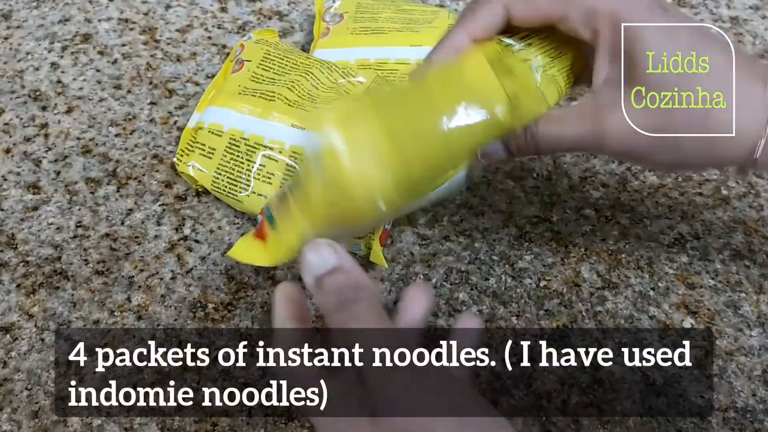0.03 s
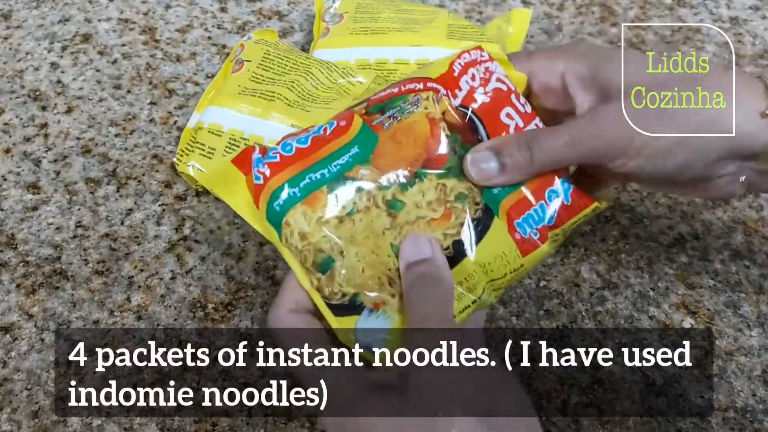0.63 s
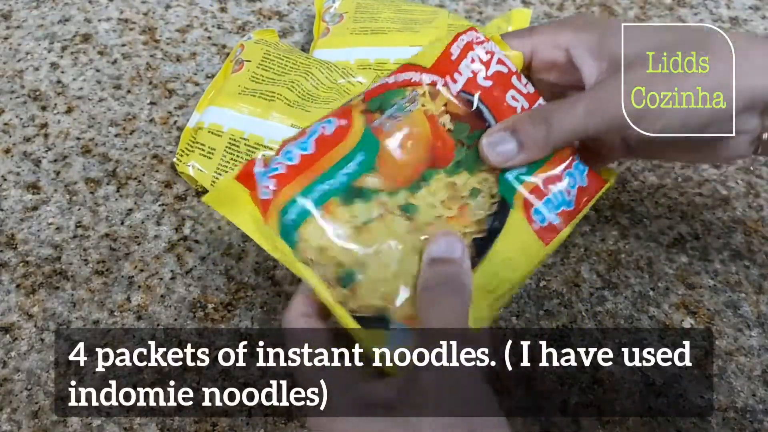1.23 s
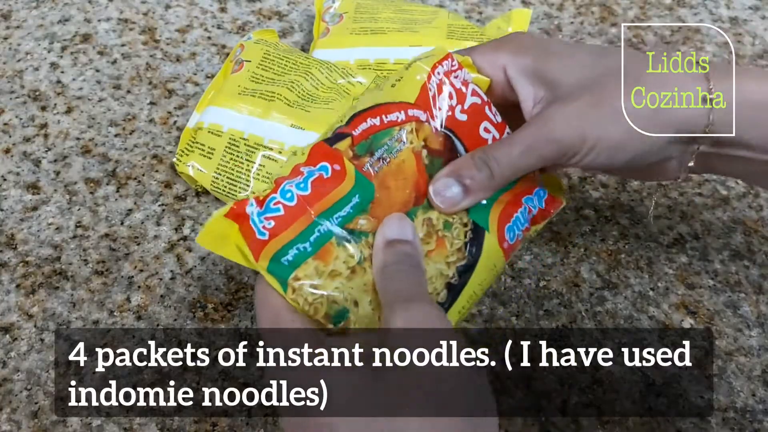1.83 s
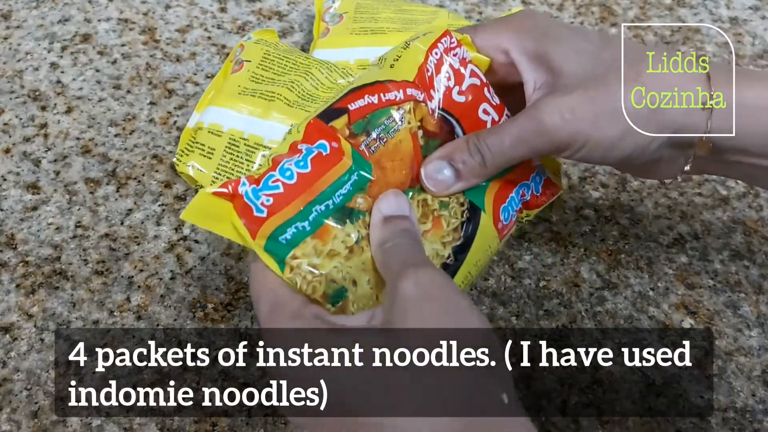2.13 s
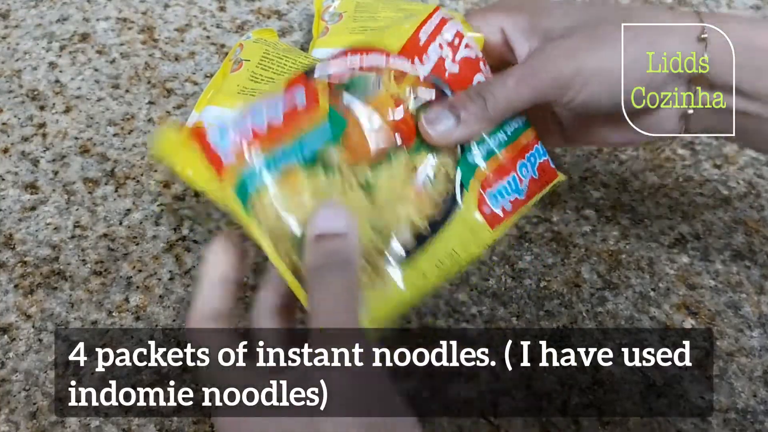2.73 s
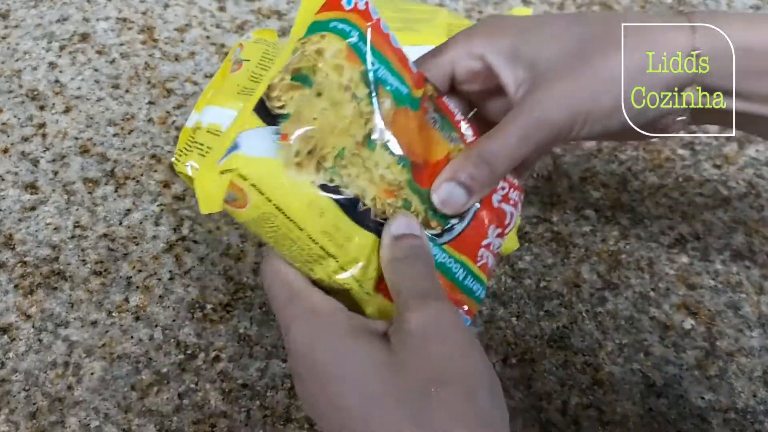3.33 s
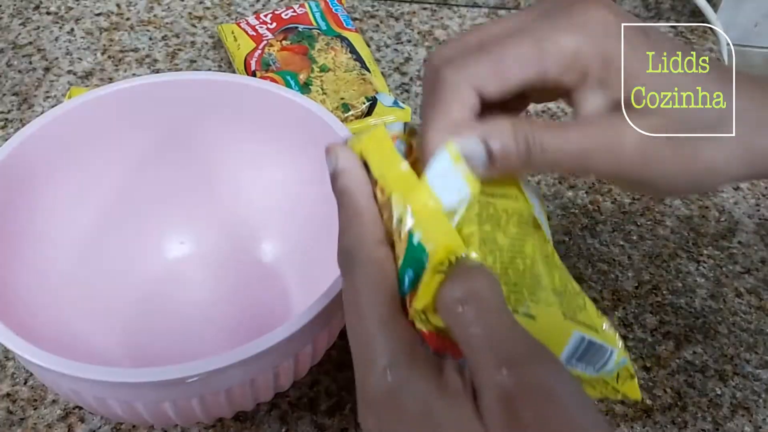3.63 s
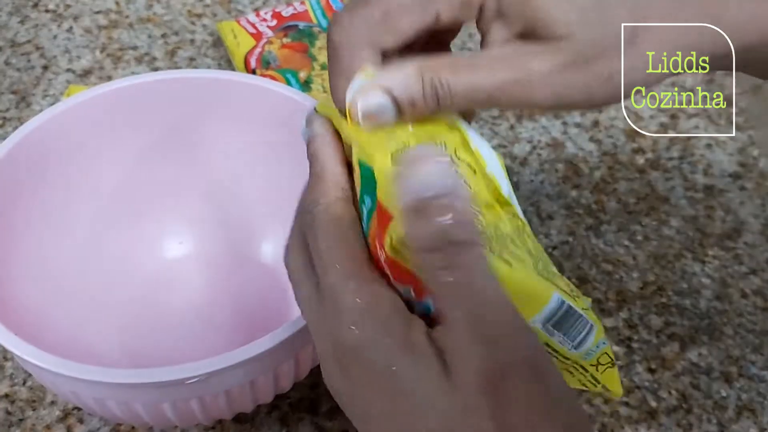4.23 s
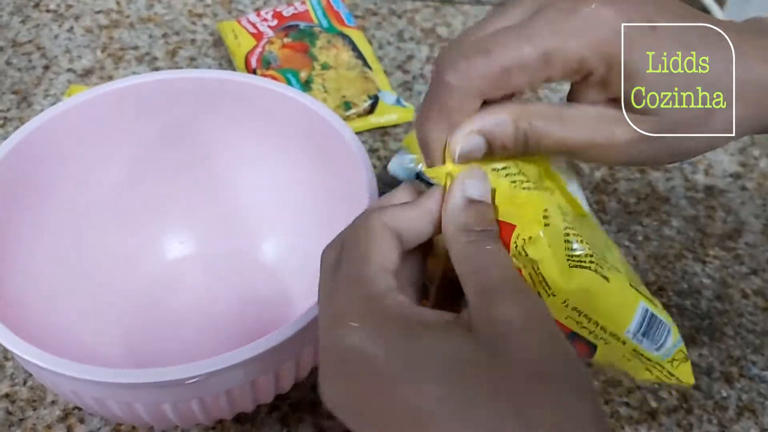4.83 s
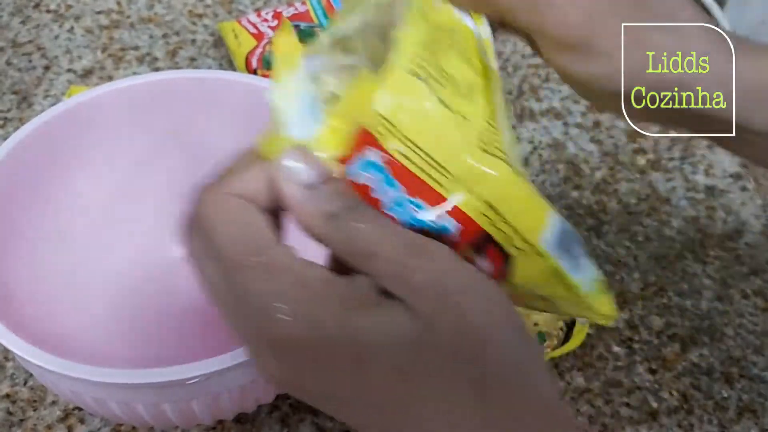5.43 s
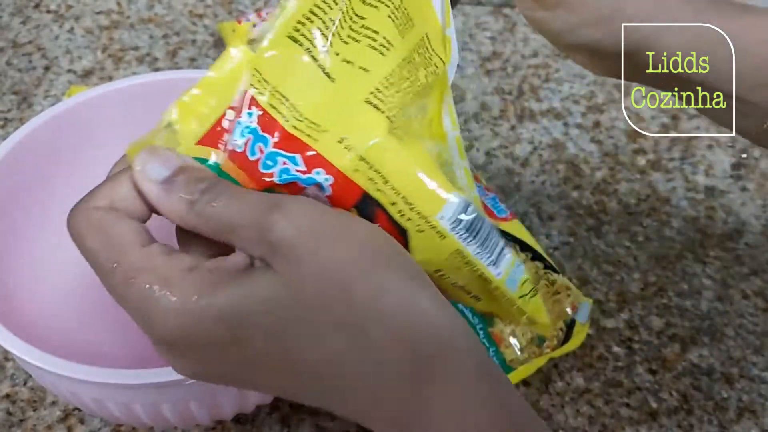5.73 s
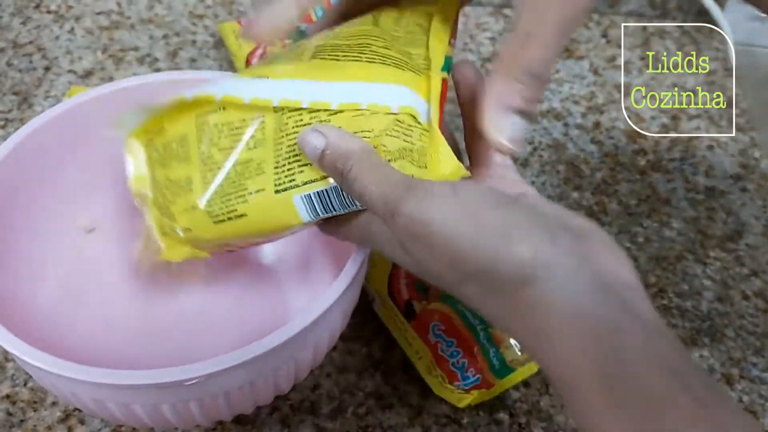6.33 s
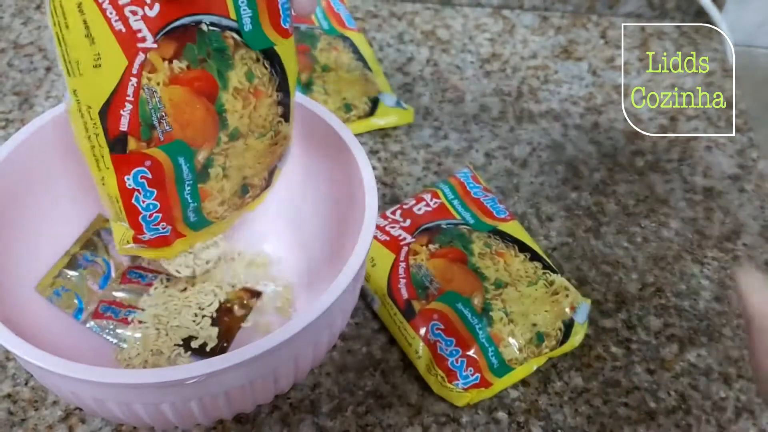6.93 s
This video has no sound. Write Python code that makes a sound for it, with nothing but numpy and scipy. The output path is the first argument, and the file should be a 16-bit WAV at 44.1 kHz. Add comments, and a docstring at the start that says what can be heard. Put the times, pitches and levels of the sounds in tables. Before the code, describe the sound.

From the start, hands squeeze a thin plastic noodle packet close by, making irregular sharp snaps and small pops over a fine crinkle. The strongest snaps come around 0.7 and 2.3 seconds, and the handling grows softer towards 3 seconds. At about 3.5 seconds the sound cuts out for an instant and returns brighter and closer, with a faint motor hum and room air slightly louder. The packet keeps crackling as fingers pull at it, with dull bumps from about 4.4 seconds. Near 5.2 seconds the seam opens in one short rip with a rough, falling note, followed by more rustling. From about 6.2 seconds dry noodles, crumbs and sachets slide into a plastic bowl, rattling most strongly around 6.5 seconds with short hollow knocks. A few lighter ticks and low thuds follow until about 6.9 seconds. The small, hard kitchen adds a brief ring.

```python
"""Noodle packet into a bowl.

Hands squeeze a plastic noodle packet over a stone counter, tear it open and tip it into a plastic bowl.
The film buckles in loud single snaps over a swarm of tiny creases; the dry noodles rattle into the bowl.
A small hard kitchen rings; dull bumps and a faint hum lie underneath. Midway the sound cuts out briefly.
"""
import sys
import numpy as np
from scipy import signal
from scipy.io import wavfile
from scipy.ndimage import uniform_filter1d

SR = 44100
rng = np.random.default_rng(int(sys.argv[2]) if len(sys.argv) > 2 else 0)


def transcribe(u):
    """Save the signal u as a 16-bit wav file named by the first command-line argument.

    u: samples, shape (n,) or (channels, n), limited to [-1, 1]; the rate is SR.
    q: integer samples, one column per channel.
    """
    v = np.clip(np.atleast_2d(u).T, -1, 1)
    q = np.round(v * 32767).astype(np.int16)
    wavfile.write(sys.argv[1], SR, q)


N = 307377
TIME_S = np.arange(N) / SR
FILTER_TAPS = 2048
DROPOUT_START_S, DROPOUT_END_S = 3.475, 3.507


def gain(db):
    """Decibels to amplitude."""
    return 10 ** (np.asarray(db) / 20)


def unit_rms(x):
    """Scales to rms 1."""
    return x / np.sqrt(np.mean(x ** 2) + 1e-20)


def unit_click(pair, window_s=0.002):
    """Scales a stereo click to the energy of rms 1 over the window."""
    return pair / np.sqrt(np.sum(pair ** 2) / 2 / (window_s * SR))


def at_hz(table, hz):
    """Interpolates a table on a log-frequency axis."""
    table_hz, values = np.transpose(table)
    return np.interp(np.log(hz + 1), np.log(table_hz + 1), values)


def curves(table):
    """The columns of a time table at every sample."""
    times_s, *columns = np.transpose(table)
    return [np.interp(TIME_S, times_s, column) for column in columns]


def strokes(rows, attack_s, release_s, rise_share=0):
    """One envelope per (start, length, level) row: linear rise, hold, exponential release."""
    envelopes = []
    for start_s, length_s, db, *_ in rows:
        rise = np.clip((TIME_S - start_s) / (attack_s + rise_share * length_s), 0, 1)
        release = np.exp(-np.maximum(TIME_S - start_s - length_s, 0) / release_s)
        envelopes.append(gain(db) * rise * release)
    return np.array(envelopes)


def add(mix, start_s, sound):
    """Mixes a sound in at start_s."""
    part = mix[:, max(round(start_s * SR), 0):][:, :sound.shape[1]]
    part += sound[:, :part.shape[1]]


def butter(order, hz, kind):
    """Butterworth filter sections."""
    return signal.butter(order, hz, kind, fs=SR, output="sos")


def coloured(x, spectrum):
    """Minimum-phase filter of unit energy; clicks keep their sharp front."""
    log_gain = np.log(gain(at_hz(spectrum, abs(np.fft.fftfreq(FILTER_TAPS, 1 / SR)))))
    pulse = np.fft.ifft(np.exp(np.conj(signal.hilbert(log_gain)))).real
    return signal.oaconvolve(x, pulse[None] / np.linalg.norm(pulse), axes=1)[:, :x.shape[1]]


def resonate(x, hz, width_hz):
    """Unity-gain resonance, steady or gliding."""
    carrier = np.exp(2j * np.pi * np.cumsum(hz * np.ones(x.shape[1])) / SR)
    pole = np.exp(-np.pi * width_hz / SR)
    return 2 * (carrier * signal.lfilter([1 - pole], [1, -pole], x / carrier + 1e-18)).real


def ringing(x, modes):
    """Adds a body's modes at constant power."""
    ring = sum(gain(db) * resonate(x, hz, width_hz) for hz, width_hz, db in modes)
    return unit_rms(x + ring) * x.std()


def tinted(x, body_db, sizzle_db, body_hz=900, sizzle_hz=4000):
    """Shifts power between low, middle and high bands."""
    low = signal.sosfiltfilt(butter(2, body_hz, "low"), x)
    high = signal.sosfiltfilt(butter(3, sizzle_hz, "high"), x)
    bands, gains = [low, x - low - high, high], [gain(body_db), 1, gain(sizzle_db)]
    power = sum(g ** 2 * b.var() for g, b in zip(gains, bands)) / sum(b.var() for b in bands)
    return sum(g * b for g, b in zip(gains, bands)) / np.sqrt(power)


def buckle(decay_s, ring_hz, ring_db, flutter_db=-20, flutter_s=0.14, samples=512):
    """A facet flips, rings and shivers; on the right it is late and has its own treble."""
    t = np.arange(samples) / SR
    flip = (t / decay_s) ** 2 * np.exp(2 - 2 * t / decay_s)
    flutter = gain(flutter_db) * np.exp(-t / flutter_s)
    burst = rng.standard_normal((2, samples)) * (flip + flutter)
    left, other = burst + gain(ring_db) * resonate(burst, ring_hz, 0.44 * ring_hz)
    crossover = butter(1, hz=1900, kind="low")
    right = signal.sosfilt(crossover, left) + other - signal.sosfilt(crossover, other)
    pair = np.array([left, np.pad(right, (4, 0))[:samples]])
    return pair / np.sqrt(np.sum(pair ** 2) / 2)


def swarm(rate_per_s, spread_db, decay_s, levelling_s, ring_db, facets=40):
    """Random tiny fractures of unequal size; larger facets are slower and lower."""
    sizes = gain(spread_db * np.minimum(rng.exponential(1, N), 3.5))
    sizes *= rng.random(N) < rate_per_s / SR
    local_power = uniform_filter1d(sizes ** 2, int(levelling_s * SR))
    sizes /= np.sqrt(abs(local_power) + 1e-4)
    facet, out = rng.integers(0, facets, N), np.zeros((2, N))
    for k, scale in enumerate(np.geomspace(1 / 3, 3, facets)):
        grain = buckle(decay_s * np.sqrt(scale), 2600 / scale, ring_db)
        out += signal.oaconvolve((sizes * (facet == k))[None], grain, axes=1)[:, :N]
    return out


# room air: (frequency [Hz], relative density [dB])
AIR_SPECTRUM = [(20, -11), (60, 0.5), (110, -22), (200, -1), (500, -13.5), (2000, -11.5), (8000, -26),
                (16000, -29)]
# motor hum: (frequency [Hz], level before dropout [dB], level after [dB])
HUM_PARTIALS = [(101, -66, -58.5), (126.6, -70.5, -54.5)]


def room_tone(air_before_db=-60, air_after_db=-53):
    """Room air and a humming motor, both louder after the dropout."""
    late = TIME_S > DROPOUT_END_S
    noise = rng.standard_normal((2, N))
    air = unit_rms(coloured(noise + 0.22 * noise[::-1], AIR_SPECTRUM))
    out = air * gain(np.where(late, air_after_db, air_before_db))
    for hz, before_db, after_db in HUM_PARTIALS:
        hum = unit_rms(resonate(noise[:1], hz, width_hz=12))
        out += hum * gain(np.where(late, after_db, before_db))
    return out


# kitchen reverberation: (frequency [Hz], T60 [s])
KITCHEN_DECAY = [(150, 0.76), (500, 1), (1500, 0.64), (4000, 0.57), (8000, 0.52), (16000, 0.62)]


def kitchen(x, tail_db=-5.5, early_db=-9, mono_below_hz=500, taps_per_s=5000, echoes=8):
    """Echoes off counter and hands, then a diffuse tail with bass alike on both sides."""
    t = np.arange(SR * 3 // 4) / SR
    taps = rng.choice([-1., 1.], (2, len(t))) * (rng.random((2, len(t))) < taps_per_s / SR)
    onset = np.clip((t - 0.003) / 0.00045, 0, 1)
    hz, frame_s, spectra = signal.stft(taps * onset, SR, nperseg=256)
    coherence = np.exp(-(hz / mono_below_hz) ** 2 / 2)[:, None]
    spectra[1] = coherence * spectra[0] + np.sqrt(1 - coherence ** 2) * spectra[1]
    decay = gain(-60 * frame_s / at_hz(KITCHEN_DECAY, hz)[:, None])
    response = signal.istft(spectra * decay, SR, nperseg=256)[1]
    response *= gain(tail_db) / np.linalg.norm(response[0])
    for side in response:
        echo_s = rng.uniform(0.001, 0.017, echoes)
        side[(echo_s * SR).astype(int)] += gain(early_db) * rng.choice([-1, 1], echoes) / np.sqrt(echoes)
    return signal.fftconvolve(x, response, axes=1)[:, :N]


# bumps of hands and packet: (time [s], level [dB], pitch [Hz])
HAND_BUMPS = [(4.426, -30, 95.5), (4.711, -30.5, 97), (4.776, -29.5, 97), (5.087, -32.5, 83.5),
              (5.144, -37, 101), (6.173, -38.5, 94), (6.548, -32.5, 121), (6.645, -31.5, 128),
              (6.668, -29, 89), (6.768, -33.5, 108), (6.827, -28.5, 176), (6.875, -24, 101)]


def bumps(rise_s=0.0097, left_vs_right_db=-27):
    """Low, quickly damped thuds, mostly on the right."""
    out, t = np.zeros((2, N)), np.arange(SR // 5) / SR
    envelope = t / rise_s * np.exp(1 - t / rise_s)
    pan = gain([[left_vs_right_db], [0]])
    for start_s, db, hz in HAND_BUMPS:
        grit = signal.sosfilt(butter(2, [0.18 * hz, 1.74 * hz], "band"), rng.standard_normal(len(t)))
        thud = np.sin(2 * np.pi * hz * t) + 0.5 * unit_rms(grit)
        add(out, start_s, gain(db) * pan / pan.mean() * envelope * thud)
    return out


def rumble(band_hz=(50, 130), left_db=-17, offset_db=-8, length_s=0.018):
    """Each bump leaves a loose low flutter."""
    rows = [(start_s, length_s, db + offset_db) for start_s, db, _ in HAND_BUMPS]
    level = np.linalg.norm(strokes(rows, attack_s=0.06, release_s=0.17), axis=0)
    flutter = signal.sosfilt(butter(2, band_hz, "band"), rng.standard_normal((2, N)))
    return unit_rms(flutter) * gain([[left_db], [0]]) * level


# air pocket in the bag: (time [s], level [dB], resonance [Hz])
AIR_POCKET = [(5.14, -40, 520), (5.2, -30, 446.6), (5.235, -24.5, 329), (5.255, -43, 330),
              (5.305, -35.5, 310), (5.33, -63, 320)]


def air_pocket(roughness=0.85):
    """Tearing drives the air in the bag; its rough note sinks as the bag opens."""
    level_db, hz = curves(AIR_POCKET)
    flapping = resonate(rng.standard_normal((1, N)), hz, width_hz=90)
    flapping = unit_rms(resonate(flapping, hz, width_hz=200))
    tone = np.sin(2 * np.pi * np.cumsum(hz) / SR)
    gate = (TIME_S >= AIR_POCKET[0][0]) & (TIME_S <= AIR_POCKET[-1][0])
    return unit_rms(tone + roughness * flapping) * gain(level_db) * gate


# bag pops and one handling thump: (time [s], peak [dB], pitch [Hz], T60 [s])
PITCHED_POPS = [(0.687, -21, 954, 0.13), (.757, -26, 1010, 0.053), (2.268, -25, 678, 0.25),
                (2.288, -26.5, 532, 0.16), (3.671, -15.5, 564, 0.027), (3.994, -25.5, 353, 0.057),
                (4.071, -22, 457, 0.043), (4.4914, -29.5, 126, 0.12), (4.489, -12.5, 420, 0.012),
                (5.223, -20, 1043, 0.09), (5.872, -19, 327, 0.032)]


def pops():
    """Short pitched pops of the air in the bag, and one low handling thump."""
    out, t = np.zeros((2, N)), np.arange(SR // 4) / SR
    for start_s, db, hz, t60_s in PITCHED_POPS:
        note = gain(db - 60 * t / t60_s) * np.sin(2 * np.pi * hz * t)
        add(out, start_s, note[None])
    return out


# pull on the seam: (start [s], length [s], level [dB])
SEAM_PULLS = [(5.16, 0.066, -17.5)]
# tearing seam: (frequency [Hz], relative density [dB])
SEAM_SPECTRUM = [(150, -14), (400, 0), (1200, -1.5), (2400, 0.5), (3700, -3), (5800, -1.5), (8000, -4),
                 (9700, -12.5), (16000, -10)]


def seam_tear():
    """The seam parts in a dense run of fractures."""
    fractures = swarm(rate_per_s=2200, spread_db=3.5, decay_s=0.00028, levelling_s=0.018, ring_db=5.5)
    level = strokes(SEAM_PULLS, attack_s=0.0096, release_s=0.026).sum(0)
    return unit_rms(coloured(fractures, SEAM_SPECTRUM)) * level


# block, sachets and crumbs sliding out: (start [s], length [s], level [dB])
NOODLE_SPILLS = [(6.2, 0.27, -33.5), (6.405, 0.086, -18), (6.475, 0.023, -23), (6.53, 0.081, -28),
                 (6.635, 0.047, -28.5), (6.745, 0.024, -29.5), (6.83, 0.069, -33.5)]
# dry noodles: (frequency [Hz], relative density [dB])
NOODLE_SPECTRUM = [(150, -38), (400, -11.5), (640, -11), (900, -8), (1500, -12), (2200, -10), (2950, -2),
                   (3900, -5), (5400, -3), (7800, -5.5), (9800, -14.5), (13000, -12), (16000, -13)]
# plastic bowl: (frequency [Hz], width [Hz], gain [dB])
BOWL_MODES = [(685, 110, 0.5), (1370, 75, 5), (1690, 46, 4), (2100, 110, 0), (3200, 50, -1)]
# hollow note, sinking as the noodles settle: (time [s], frequency [Hz])
HOLLOW_GLIDE = [(6.44, 2690), (6.6, 2260)]


def pour(hollow_width_hz=380, hollow_db=1, right_lag_samples=7):
    """Dry crumbs strike the bowl on the left, thickest as the block drops out."""
    level = np.linalg.norm(strokes(NOODLE_SPILLS, attack_s=0.0075, release_s=0.062), axis=0)
    rate_per_s = 220 + 1400 * level / gain(-17)
    crumbs = swarm(rate_per_s, spread_db=3, decay_s=0.0012, levelling_s=0.04, ring_db=7)
    hollow_mode = (curves(HOLLOW_GLIDE)[0], hollow_width_hz, hollow_db)
    rattle = ringing(coloured(crumbs, NOODLE_SPECTRUM), BOWL_MODES + [hollow_mode])
    left, right = unit_rms(rattle) * level
    return np.array([left, np.roll(right, right_lag_samples)])


# lumps and sachets landing: (time [s], level over 2 ms [dB], pitch [Hz])
BOWL_KNOCKS = [(6.4352, -15.5, 670), (6.4474, -15, 2500), (6.4527, -30, 3200), (6.4805, -9, 2870),
               (6.4932, -18, 2950), (6.4972, -16, 2800), (6.5135, -21, 3100), (6.5235, -16, 3060),
               (6.5861, -18.5, 1380), (6.68, -21.5, 2320), (6.757, -26, 3460), (6.783, -27, 5000)]


def knocks():
    """A hard lump lands; the thin plastic wall answers with a short hollow note."""
    out = np.zeros((2, N))
    for start_s, db, hz in BOWL_KNOCKS:
        blow = buckle(decay_s=0.00089, ring_hz=hz, ring_db=10, samples=1024)
        knock = ringing(coloured(blow, FILM_SPECTRUM), BOWL_MODES)
        add(out, start_s, gain(db) * unit_click(knock))
    return out


# thin plastic: (frequency [Hz], relative density [dB])
FILM_SPECTRUM = [(40, -52), (100, -10.5), (220, -12), (320, -3.5), (420, -4), (570, -3), (800, -8),
                 (1400, -4), (2300, -0.5), (3000, -2.5), (3800, -5), (6200, -6), (8000, -10.5),
                 (9500, -17.5), (16000, -19)]
# squeezes and pulls: (start [s], length [s], level [dB], body [dB], sizzle [dB])
FINGER_GRIPS = [(-0.02, 0.36, -32.5, -2, -0.5), (0.356, 0.14, -44, -0.5, -8), (0.552, 0.11, -29.5, 1, -2.5),
                (0.742, 0.24, -44.5, 6.5, 26), (0.939, 0.068, -29.5, -13, 2.5),
                (1.131, 0.18, -35.5, 2, -1.5), (1.376, 0.087, -36.5, 2, -3.5),
                (1.468, 0.053, -32.5, 1.5, -3), (1.577, 0.045, -39.5, 8, -4), (1.66, 0.2, -42.5, -6.5, -4),
                (2.102, 0.1, -39, 4.5, 17), (2.248, 0.045, -22.5, -1.5, 10), (2.32, 0.064, -42, -16, 7),
                (2.468, 0.21, -37.5, 4, 1.5), (2.753, 0.085, -55, 4, -2), (2.883, 0.13, -46, 5, 1.5),
                (3.022, 0.095, -38, 2.5, 0.5), (3.14, 0.045, -48.5, 4, -10), (3.258, 0.15, -41.5, 1, -3),
                (3.421, 0.035, -35, -4, -1), (3.494, 0.075, -32.5, 0.5, -0.5),
                (3.615, 0.1, -28.5, 0.5, 4.5), (3.732, 0.078, -32, 9, 8.5), (3.863, 0.19, -38, 2, 3),
                (4.157, 0.23, -36.5, 7, 4), (4.402, 0.065, -41.5, 7, 2), (4.599, 0.062, -33, 7.5, 8),
                (4.722, 0.1, -35.5, -10.5, 3.5), (4.844, 0.18, -31.5, -0.5, -1.5),
                (5.104, 0.14, -30, 1, 0.5), (5.266, 0.058, -27, -1, 3.5), (5.443, 0.21, -34.5, 4, 0.5),
                (5.657, 0.12, -39.5, 5.5, 0.5), (5.802, 0.097, -36.5, 8.5, 1), (5.89, 0.14, -42, 5.5, 3),
                (6.041, 0.24, -36.5, 4, 0), (6.37, 0.089, -27, -20, -4)]


def creases(trim_db=3, resting_db=-55):
    """Harder grips flip more creases per second; slack panels give body, taut creases sizzle."""
    grip_power = strokes(FINGER_GRIPS, attack_s=0.0119, release_s=0.015, rise_share=0.1) ** 2
    power = grip_power.sum(0) + gain(resting_db) ** 2
    body_db, sizzle_db = np.array(FINGER_GRIPS)[:, 3:].T @ grip_power / power
    level = np.sqrt(power)
    rate_per_s = 300 + 1800 * (level / gain(-21.5)) ** 1.5
    ticks = swarm(rate_per_s, spread_db=3.5, decay_s=0.00048, levelling_s=0.048, ring_db=1.5)
    film = unit_rms(coloured(ticks, FILM_SPECTRUM))
    return tinted(film, body_db, sizzle_db) * level * gain(trim_db)


# snaps of the film and a last crack of dry noodle: (time [s], level [dB], sizzle [dB])
LOUD_SNAPS = [(.0352, -48, 9), (0.0916, -21.5, -0.5), (0.3133, -20.5, -4.5), (.329, -21, 13),
              (.376, -25.5, 9), (0.4187, -25.5, -4), (.4535, -28.5, 2), (.4636, -31, -3),
              (0.483, -26.5, -2), (0.511, -25.5, -0.5), (.562, -24, -6), (.5835, -20.5, 1),
              (0.6253, -20.5, -9), (.638, -14, -3), (0.6608, -31, 4), (0.6859, -12, -4.5), (.697, -26, 0),
              (0.7464, -25, 8), (.756, -26, 5), (0.8491, -17, -4.5), (.8603, -27, -3), (.901, -27, 8),
              (.911, -23.5, -8), (0.9195, -30, 6), (0.9415, -22, 11), (0.96, -24, 6), (1.0527, -28.5, -4),
              (1.0646, -28.5, -8), (1.1921, -24, 0), (1.1965, -23.5, -7), (1.2512, -20.5, 3.5),
              (1.2661, -30.5, -6), (1.4131, -28, -1), (1.5348, -28, -11), (1.587, -25.5, -3),
              (1.6254, -22, -8), (1.663, -17.5, -4), (1.7331, -32, -2), (1.7614, -28.5, -4),
              (1.7748, -24.5, 3), (1.806, -23, -5.5), (1.8123, -22, -9), (1.8346, -23, -2),
              (1.849, -26, -10), (1.8603, -20, -3), (1.8742, -24.5, -3), (1.918, -29.5, -6),
              (1.9366, -36, 1), (1.961, -27, 0), (2.003, -25.5, 9), (2.0181, -16, -5), (2.1096, -23.5, -3),
              (2.149, -26, 3), (2.157, -24, 3), (2.1987, -19.5, 3), (2.2458, -18.5, -1), (2.2595, -20, -1),
              (2.2674, -12, -8), (2.286, -23, -10), (2.297, -15.5, -2), (2.454, -27.5, 3.5),
              (2.553, -30, 1), (2.5603, -32, -13), (2.6011, -28, -8), (2.6234, -34, -13), (2.632, -30.5, 5),
              (2.7013, -33.5, -13), (2.878, -32.5, -2), (2.9568, -31.5, -2), (3.1136, -33.5, -11),
              (3.1854, -30.5, 3), (3.3399, -31.5, -1), (3.5081, -23, 17), (3.5128, -22, 7),
              (3.5293, -23.5, 13), (3.5526, -23, 0), (3.617, -19, 8), (3.6247, -18.5, -2),
              (3.6462, -17, -10), (3.6718, -16, -6), (3.6956, -21.5, -10), (3.7684, -22, 7),
              (3.7888, -19.5, 1), (3.795, -21, 6), (3.8526, -23, -6), (3.9, -23.5, -1), (3.978, -24.5, 5),
              (3.9946, -21.5, 2.5), (4.0167, -24, 9), (4.04, -21, 17), (4.0705, -20, -5.5),
              (4.1163, -22, 7), (4.171, -24, 6.5), (4.1808, -27.5, 0), (4.235, -26, 6), (4.2581, -25, 2),
              (4.273, -23.5, 6), (4.328, -22.5, 5), (4.413, -26.5, 16), (4.4914, -18.5, 5),
              (4.6538, -26.5, 7), (4.777, -21, 6.5), (4.7962, -22.5, 4), (4.896, -23, 16), (4.9388, -22, 1),
              (4.965, -23.5, 4), (5.1551, -18, 11), (5.2115, -19.5, 5), (5.283, -21.5, 4),
              (5.5086, -28, -4), (5.554, -21.5, 15), (5.622, -19.5, 3.5), (5.715, -23, 7), (5.8338, -29, 0),
              (5.875, -25.5, 5), (6.2896, -16, 6.5), (6.332, -21, 5), (6.41, -17, -12)]


def snaps(lead_s=0.004, trim_db=4.5, base_hz=1900, db_per_octave=24, neighbour_s=0.0015, neighbour_db=-12):
    """Panels buckle and drag a neighbour, dull ones lower and longer; the last snap is dry noodle."""
    out = np.zeros((2, N))
    grip_s, _, _, grip_body_db, _ = np.transpose(FINGER_GRIPS)
    bass_cut = butter(2, hz=420, kind="high")  # a light panel radiates little bass
    for start_s, db, sizzle_db in LOUD_SNAPS:
        slack_db = 0.43 * np.interp(start_s, grip_s, grip_body_db) - 1
        body_db = slack_db - 0.25 * max(sizzle_db, 0)
        ring_hz = min(base_hz * 2 ** ((sizzle_db - body_db) / db_per_octave), SR / 5)
        decay_s = 0.00075 * gain(-0.25 * sizzle_db)
        burst = np.zeros((2, FILTER_TAPS))
        for delay_s, flip_db in (0, 0), (neighbour_s * rng.uniform(0.5, 1.4), neighbour_db):
            flip = buckle(decay_s, ring_hz, ring_db=-6, flutter_db=-19, flutter_s=0.012)
            add(burst, lead_s + delay_s, gain(flip_db) * flip)
        snap = tinted(coloured(burst, FILM_SPECTRUM), body_db, sizzle_db)
        snap = signal.sosfilt(bass_cut, snap)
        add(out, start_s - lead_s, gain(db + trim_db) * unit_click(snap))
    return out


# bag resonances: (frequency [Hz], width [Hz], gain [dB])
PACKET_MODES = [(750, 30, -2.5), (980, 22, 1), (1120, 500, -5.5)]


def packet(treble_hz=8500, treble_db=-10):
    """Creases and snaps ring the bag; after the dropout it is closer and sounds brighter."""
    film = creases() + snaps()
    treble = gain(treble_db) * signal.sosfiltfilt(butter(2, treble_hz, "high"), film)
    return ringing(film, PACKET_MODES) + treble * (TIME_S > DROPOUT_END_S)


def scene():
    """Packet and bowl excite the kitchen; soft notes, bumps and room tone stay dry."""
    crackle = packet() + seam_tear() + pour() + knocks()
    return crackle + kitchen(crackle) + pops() + air_pocket() + bumps() + rumble() + room_tone()


def record(dry, bass_cut_hz=42, band_limit_hz=15950):
    """Bass cut, brief dropout, clipping at full scale, band limit."""
    thinned = signal.sosfilt(butter(2, bass_cut_hz, "high"), dry)
    audible = (TIME_S < DROPOUT_START_S) | (TIME_S > DROPOUT_END_S)
    gate = uniform_filter1d(audible.astype(float), size=32)
    low_pass = signal.firwin(511, band_limit_hz, window=("kaiser", 9), fs=SR)
    return signal.oaconvolve(np.clip(thinned * gate, -1, 1), low_pass[None], "same")


dry = scene()
out = record(dry)
transcribe(out)
```